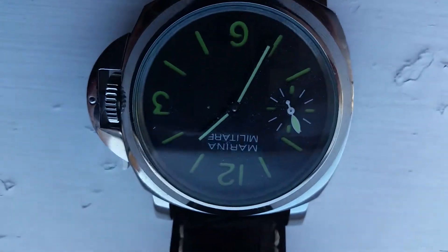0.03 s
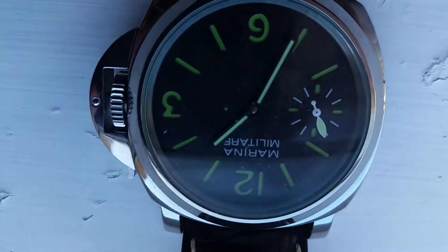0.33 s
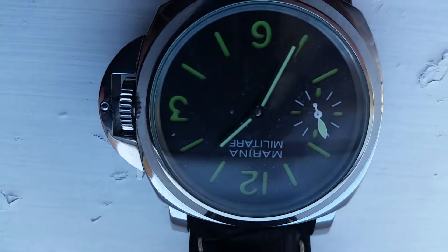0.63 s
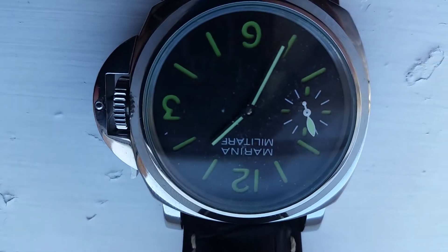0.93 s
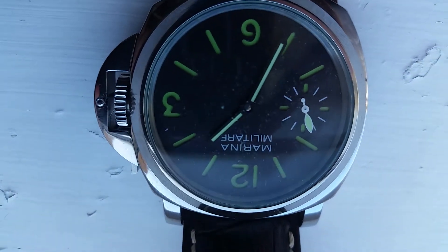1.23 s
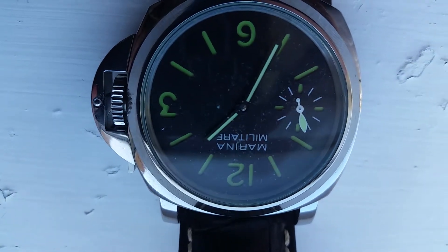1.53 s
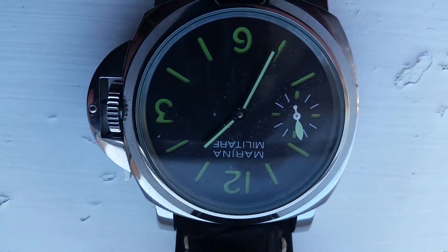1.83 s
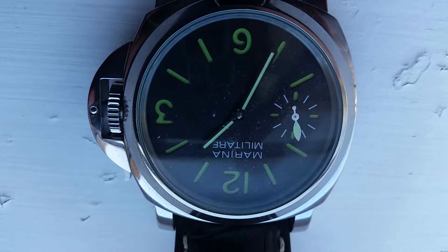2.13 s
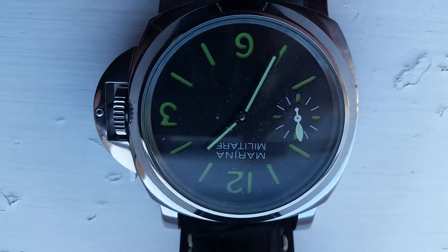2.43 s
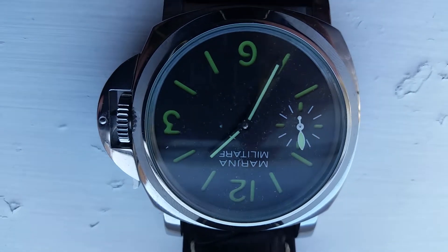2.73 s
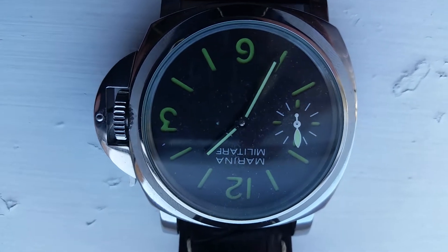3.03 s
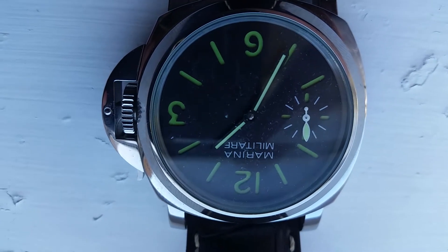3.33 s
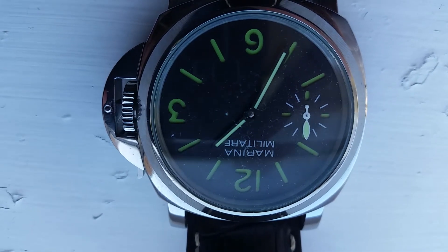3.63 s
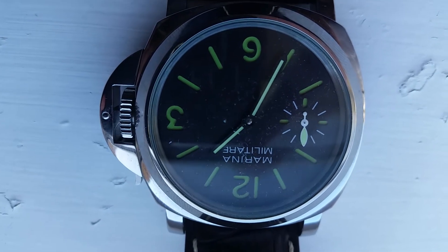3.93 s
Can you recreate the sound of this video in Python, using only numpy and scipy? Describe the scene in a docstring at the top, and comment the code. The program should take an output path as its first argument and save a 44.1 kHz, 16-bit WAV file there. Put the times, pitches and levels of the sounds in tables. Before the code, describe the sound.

A wristwatch ticks faintly close by, six thin metallic beats a second, clearer after 1 second. A distant fan's low rumble and hum fill the quiet room, with soft hiss. Dull hand bumps hit on the right at about 1.4, 2.2, 2.6 and 3.9 seconds. The camera housing clicks lightly near 0.8 and 2.5 seconds, and a very faint, high lens whine grows around 3 seconds.

```python
"""A mechanical wristwatch ticks faintly, six beats a second, just under a hand-held camera's stereo mic.
Each beat is two quick contacts of the escapement that ring the steel case. The room is quiet;
a distant fan rumbles and hums. Right at the mic, the camera hisses, its lens whines thinly and
its housing gives a few small clicks, while the hand rumbles and bumps on the right port."""
import sys
import numpy as np
from scipy import signal
from scipy.fft import rfft, irfft, next_fast_len
from scipy.io import wavfile
from scipy.ndimage import map_coordinates

SR = 44100
rng = np.random.default_rng(int(sys.argv[2]) if len(sys.argv) > 2 else 0)


def store_wav(level_fs):
    """Save 16-bit WAV to argv[1]."""
    pcm = np.round(np.clip(np.atleast_2d(level_fs), -1, 1) * 32767)
    wavfile.write(sys.argv[1], SR, pcm.T.astype(np.int16))


N = 176400

# Spectra give shape only; a *_GAIN_DB adds to the levels of its layer.
# likeness of the two mic ports: f/Hz, correlation
PORT_LIKENESS = [(40, 0.39), (80, .55), (130, 1), (250, 0.95), (470, 0.86), (720, 0.094), (860, 0.57),
                 (1100, 0.5), (1400, -0.56), (1750, 0.03), (2200, -0.0076), (3000, -0.0089),
                 (15000, -0.042)]
# shading by the camera body: f/Hz, left minus right level/dB
PORT_TILT = [(120, -1), (330, -1), (470, 0.5), (620, -0.5), (820, -7.5), (1000, 1), (1200, -1),
             (1500, -2.5), (2600, -0.5), (4500, 3.5), (5500, 5), (6300, -2), (6900, -5.5), (7800, -2),
             (10500, 0), (12500, -3), (15000, -1.2)]
# lead of the right port: f/Hz, phase/rad
PORT_LEAD = [(60, 0), (250, .17), (430, 0.46), (700, 0.13), (2000, 0.021)]
# spectrum of the steady mic hiss: f/Hz, level/dB
MIC_HISS_SPECTRUM = [(2000, 1.5), (4000, -1.5), (6000, -3.5), (9000, -5), (16000, -1)]

# room tone in three bands: t/s, bass level/dB, middle level/dB, treble level/dB
ROOM_LEVELS = [(0, -52.5, -62, -84.5), (.15, -53, -64, -96), (.32, -52, -67, -102),
               (.5, -50.5, -66.5, -100), (.75, -48, -62, -92.5), (1.15, -47, -59, -89.5),
               (1.45, -46.5, -58.5, -90), (1.8, -49, -59.5, -90.5), (2.3, -47, -58, -88),
               (2.95, -47, -58.5, -88.5), (4, -48.5, -57.5, -87)]
# spectra of those bands: f/Hz, level/dB
BASS_SPECTRUM = [(20, -22), (42, -9), (62, -9), (100, -10.5), (130, -1.5), (165, -6), (230, -7),
                 (320, -12.5), (430, -12), (560, -23), (900, -53.5)]
MIDDLE_SPECTRUM = [(200, -30), (400, -12.5), (540, -0.5), (720, -4.5), (840, -4), (950, -7.5), (1170, -5),
                   (1400, -7.5), (1900, -14.5), (2450, -15), (3200, -28.5), (4000, -35.5), (5000, -38),
                   (6000, -46), (9000, -61.5)]
TREBLE_SPECTRUM = [(2000, -13.5), (5000, -12.5), (7700, -16.5), (9400, -20), (11500, -7.5), (14000, -2),
                   (15300, -1), (16000, -3)]
BASS_GAIN_DB, MIDDLE_GAIN_DB, TREBLE_GAIN_DB = 1.5, 0.5, 11.5

# the distant fan's main drone: t/s, level/dB
DRONE_LEVELS = [(0, -47), (.25, -60.5), (.42, -51), (.7, -47.5), (.85, -62.5), (1.02, -46.5), (1.3, -54),
                (1.8, -50), (2.05, -54), (2.3, -42.5), (2.7, -57.5), (2.95, -42.5), (3.25, -54.5),
                (3.45, -42.5), (3.72, -42), (4, -50)]
# its weaker lines: f/Hz, level/dB at median room bass, unsteadiness (0-1)
FAN_LINES = [(188.3, -51.5, 0.6), (225.7, -59, 0.9), (275.9, -59.5, 0.65), (376, -71, 1), (561, -69.5, 1),
             (683, -72, 0.6), (822, -70, .75)]

# lens whine: t/s, level/dB
WHINE_LEVELS = [(0, -91), (.5, -101), (1.1, -95), (2.2, -92), (2.65, -88.5), (3.15, -82), (3.6, -82.5),
                (4, -83)]
# its narrow band: f/Hz, level/dB
WHINE_SPECTRUM = [(5600, -36.5), (6250, -9.5), (6550, 0), (6850, -1.5), (7150, -8), (7500, -27.5)]

# grip rumble at the right port: t/s, level/dB
GRIP_LEVELS = [(0, -42.5), (.15, -59.5), (.9, -56.5), (1.4, -52), (1.6, -54.5), (1.95, -47.5),
               (2.15, -49.5), (2.35, -46), (2.47, -42.5), (2.58, -49.5), (2.74, -44), (2.84, -51),
               (3.1, -47), (3.3, -46.5), (3.8, -50.5), (3.93, -38.5), (4, -43.5)]
# hand bumps: t/s, swing level/dB, knock level/dB, swing f/Hz, swing t60/s
HAND_BUMPS = [(1.407, -29, -44, 80, 0.12), (2.2132, -21, -24.5, 76, 0.21), (2.61, -22, -37, 80, 0.13),
              (3.907, -28, -32.5, 72, 0.15)]
# spectra of the grip rumble and of a bump's scuff: f/Hz, level/dB
GRIP_SPECTRUM = [(15, -15.5), (35, 3), (70, 4), (100, -4), (160, -11), (300, -27), (800, -39), (2000, -73)]
SCUFF_SPECTRUM = [(40, -18), (150, 4), (350, 0), (700, -9.5), (1100, -16), (1700, -42), (3000, -69)]
GRIP_GAIN_DB, SCUFF_GAIN_DB, LEFT_GAIN_DB = 6.5, -8.5, -25.5
PUSH_RISE_S, SKIN_CUTOFF_HZ = 0.0006, 1300  # soft skin passes little treble

# housing clicks: t/s, ring level/dB, snap level/dB, t60/s
HOUSING_CLICKS = [(0.8448, -68, -56, 0.036), (.861, -75, -66.5, .035), (2.465, -52, -78.5, 0.036),
                  (2.489, -56, -84.5, 0.032)]
# spectra of the plastic ring and the dry snap: f/Hz, level/dB
PLASTIC_SPECTRUM = [(500, -28), (1500, -15), (2100, 7), (2700, -9), (3400, -15), (4300, -23), (5000, -12),
                    (5700, -25), (9000, -38)]
SNAP_SPECTRUM = [(600, 1), (2800, 5.5), (4000, -11), (5500, -9), (7000, -9.5), (10000, -18.5), (13500, -5),
                 (16000, -15.5)]

# escapement beats: t/s, upper ring level/dB, lower ring level/dB
WATCH_BEATS = [(.113, -88, -79), (0.271, -95, -91), (.446, -82, -101), (.605, -78, -91.5),
               (.779, -78.5, -86.5), (0.94, -81, -87), (1.1122, -72, -82), (1.271, -72.5, -79),
               (1.446, -71, -89), (1.605, -82.5, -77), (1.779, -74.5, -86), (1.938, -84, -83),
               (2.1122, -68.5, -83), (2.271, -77.5, -82), (2.445, -73, -78), (2.604, -75.5, -84),
               (2.7792, -68.5, -88), (2.937, -78, -82), (3.1127, -70, -83), (3.271, -77, -81),
               (3.446, -72, -80), (3.604, -79.5, -85), (3.779, -71, -83), (3.939, -75, -88)]
# upper and lower ring of the watch case: f/Hz, rough width/Hz, gain/dB
CASE_RINGS = [(14850, 900, 0.5), (10840, 850, -2)]
# spectrum of a contact's crack: f/Hz, level/dB
CRACK_SPECTRUM = [(3000, -12.5), (5000, 1), (6700, 1), (8500, -4), (13000, 2.5), (16000, 1)]
WATCH_GAIN_DB, CRACK_GAIN_DB, TICK_T60_S, CONTACT_GAP_S = 4.5, -8, .012, .0011


def amp(db):
    """Decibels to gain."""
    return 10 ** (np.asarray(db) / 20)


def unit(x):
    """Scale to rms 1."""
    return x / np.sqrt(np.mean(x ** 2) + 1e-30)


def along(points, hz):
    """Read (f/Hz, value) points on a log frequency axis."""
    f, values = np.transpose(points)
    return np.interp(np.log(hz + 1), np.log(f + 1), values)


def curves(rows):
    """One value per sample for each column after the time."""
    times, *columns = np.transpose(rows)
    return [np.interp(np.arange(N) / SR, times, column) for column in columns]


def wobble(rate):
    """A smooth random curve of rms 1, rate knots a second."""
    knots = rng.standard_normal(N // 40)
    return unit(map_coordinates(knots, [2 + np.arange(N) * rate / SR], mode="mirror"))


def filtered(x, response):
    """Pass x through a frequency response."""
    size = next_fast_len(N + 8192)
    return irfft(rfft(x, size) * response(np.fft.rfftfreq(size, 1 / SR)), size)[..., :N]


def burst(start, t60, attack=0.00017):
    """Envelope of a blow; all times in seconds."""
    age = np.maximum(np.arange(N) / SR - start, 0)
    return (1 - np.exp(-age / attack)) * amp(-np.minimum(60 * age / t60, 200))


def spread(hz):
    """Mid-side angle in radians: zero when both ports hear the same."""
    return np.arccos(np.clip(along(PORT_LIKENESS, hz), -1, 1)) / 2


def stereo_noise(spectrum):
    """Noise of rms 1, alike at both ports in the bass, rolled off above the spectrum's last point."""
    def response(hz):
        colour = amp(along(spectrum, hz)) / np.maximum(1, hz / spectrum[-1][0]) ** 2
        return colour * np.array([np.cos(spread(hz)), np.sin(spread(hz))])
    mid, side = filtered(rng.standard_normal((2, N)), response)
    return unit(np.array([mid + side, mid - side]))


def mic_ports(x):
    """The camera body shades and delays each frequency differently at the two ports."""
    sides = np.array([[.5], [-.5]])
    return filtered(x, lambda hz: amp(sides * along(PORT_TILT, hz))
                    * np.exp(-1j * sides * along(PORT_LEAD, hz)))


def mic_hiss():
    """The microphone's own steady noise floor."""
    return amp(-89.5) * stereo_noise(MIC_HISS_SPECTRUM)


def room_tone():
    """Room tone in three bands; its recorded level dips in the first second, then recovers."""
    bass_db, middle_db, treble_db = curves(ROOM_LEVELS)
    bass = amp(bass_db + BASS_GAIN_DB + 0.22 * wobble(3.3)) * stereo_noise(BASS_SPECTRUM)
    middle = amp(middle_db + MIDDLE_GAIN_DB + 0.19 * wobble(11)) * stereo_noise(MIDDLE_SPECTRUM)
    treble = amp(treble_db + TREBLE_GAIN_DB) * stereo_noise(TREBLE_SPECTRUM)
    return bass + middle + treble


def hum(hz, unsteady):
    """One fan line of rms 1, wavering in level and phase, a little different at each port."""
    sway = lambda: unit(wobble(6) + 0.84 * wobble(30))  # slow drift plus flutter
    drift = lambda: (sway() + 1j * sway()) / np.sqrt(2)
    envelope = np.sqrt(1 - unsteady ** 2) + unsteady * drift()
    line = envelope * np.exp(2j * np.pi * (hz * np.arange(N) / SR + rng.random()))
    apart = spread(hz) * drift()
    return unit(np.real([line * (1 + apart), line * (1 - apart)]))


def distant_fan():
    """Far from the mic, a drone swells and sinks; weaker lines follow the bass of the room tone."""
    bass_db = curves(ROOM_LEVELS)[0]
    swell = amp(0.87 * (bass_db - np.median(bass_db)))
    lines = sum(amp(db) * hum(hz, unsteady) for hz, db, unsteady in FAN_LINES)
    drone = amp(curves(DRONE_LEVELS)[0]) * hum(hz=119, unsteady=.6)
    return swell * lines + drone


def lens_whine(peak_s=.2, half_width_s=.15):
    """Beside the mic, the lens gives one brief arching whistle and a narrow whine that grows."""
    arch = np.minimum(((np.arange(N) / SR - peak_s) / half_width_s) ** 2, 10)
    hz = 6850 - 560 * arch + 35 * wobble(90)  # pitch and level sag either side of the peak
    whistle = amp(-88 - 13 * arch) * unit(np.cos(2 * np.pi * np.cumsum(hz) / SR))
    whine = amp(curves(WHINE_LEVELS)[0] + 1.6 * wobble(30)) * stereo_noise(WHINE_SPECTRUM)
    return whistle + whine


def handling_noise():
    """On the right port, the grip rumbles; a bump is a quick push, a dull scuff and a few low swings."""
    t = np.arange(N) / SR
    grip_db = curves(GRIP_LEVELS)[0] + GRIP_GAIN_DB + 1.9 * wobble(14)
    grip = amp(grip_db) * stereo_noise(GRIP_SPECTRUM)[0]
    scuff = amp(SCUFF_GAIN_DB) * stereo_noise(SCUFF_SPECTRUM)[0]
    bumps = np.zeros(N)
    for start, swing_db, knock_db, hz, t60 in HAND_BUMPS:
        rise = np.clip((t - start) / PUSH_RISE_S, 0, 20)
        push = rise * np.exp(1 - rise)
        knock = scuff * burst(start, t60=0.051, attack=0.00069) - push
        swing = -np.sin(2 * np.pi * hz * (t - start)) * burst(start, t60, attack=0.0015)
        bumps += amp(knock_db) * knock + amp(swing_db) * swing
    skin = signal.butter(4, SKIN_CUTOFF_HZ, fs=SR, output="sos")
    right = grip + signal.sosfilt(skin, bumps)
    return np.array([amp(LEFT_GAIN_DB) * right, right])


def housing_clicks():
    """Right at the mic, the camera housing clicks: part plastic ring, part dry snap."""
    ring, snap = stereo_noise(PLASTIC_SPECTRUM), stereo_noise(SNAP_SPECTRUM)
    return sum(burst(start, t60, attack=0.0006) * (amp(ring_db) * ring + amp(snap_db) * snap)
               for start, ring_db, snap_db, t60 in HOUSING_CLICKS)


def wristwatch():
    """Under the mic, the escapement strikes twice a beat: a tiny crack and two rings of the steel case."""
    t = np.arange(N) / SR
    crack = amp(CRACK_GAIN_DB) * stereo_noise(CRACK_SPECTRUM)
    upper, lower = [amp(db) * np.array([np.sin(2 * np.pi * hz * t + wobble(width)) for _ in range(2)])
                    for hz, width, db in CASE_RINGS]  # phase wobble widens each ring
    ticks = np.zeros((2, N))
    for start, upper_db, lower_db in WATCH_BEATS:
        contacts = burst(start, TICK_T60_S) + burst(start + CONTACT_GAP_S, TICK_T60_S)
        ticks += contacts * (amp(upper_db) * (upper + crack) + amp(lower_db) * lower)
    return amp(WATCH_GAIN_DB) * ticks


def scene():
    """Airborne sound at the two ports, over mic hiss and handling noise."""
    airborne = room_tone() + distant_fan() + wristwatch() + housing_clicks() + lens_whine()
    return mic_ports(airborne) + mic_hiss() + handling_noise()


def record(dry):
    """The sound fades in and out over 6 ms, with nothing above 15.8 kHz."""
    t = np.arange(N) / SR
    from_edge_s = np.minimum(t, t[::-1])
    fade = np.sin(np.pi / 2 * np.minimum(1, from_edge_s / .006))
    return filtered(dry * fade, lambda hz: hz < 15800)


dry = scene()
out = record(dry)
store_wav(out)
```